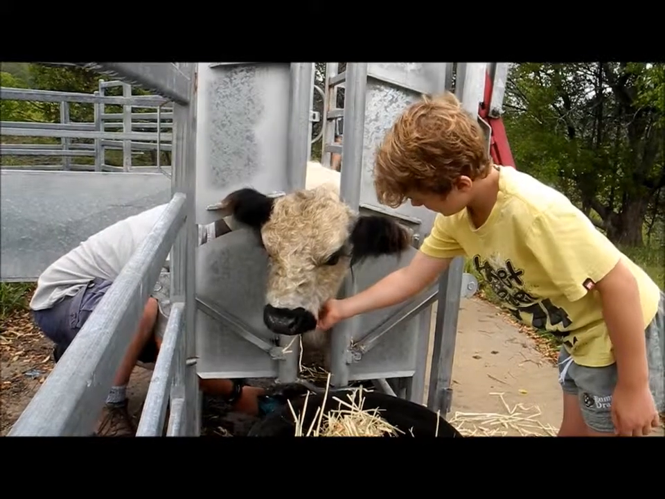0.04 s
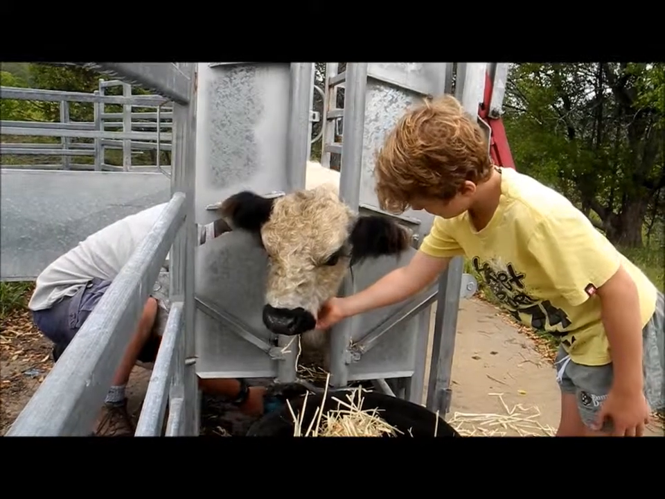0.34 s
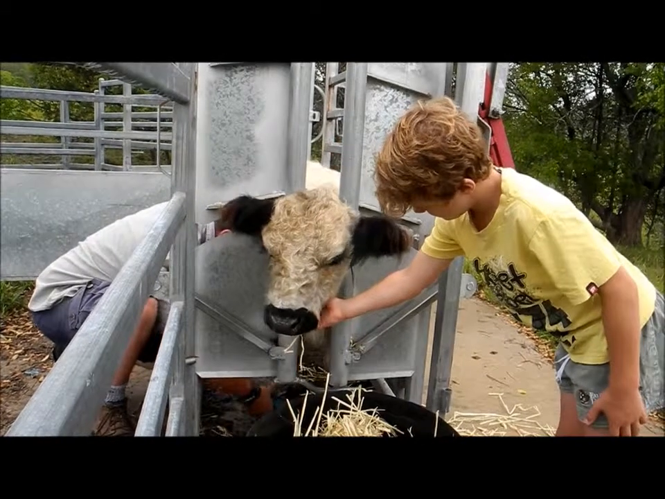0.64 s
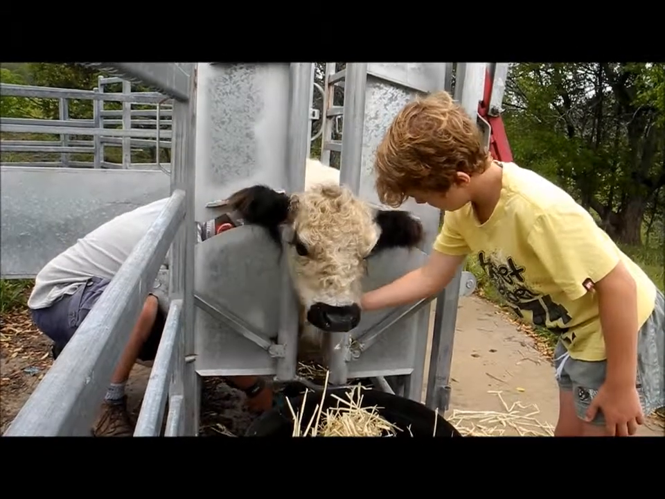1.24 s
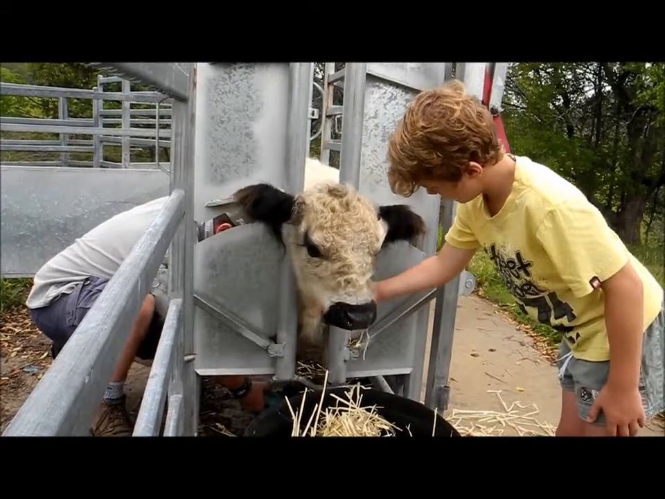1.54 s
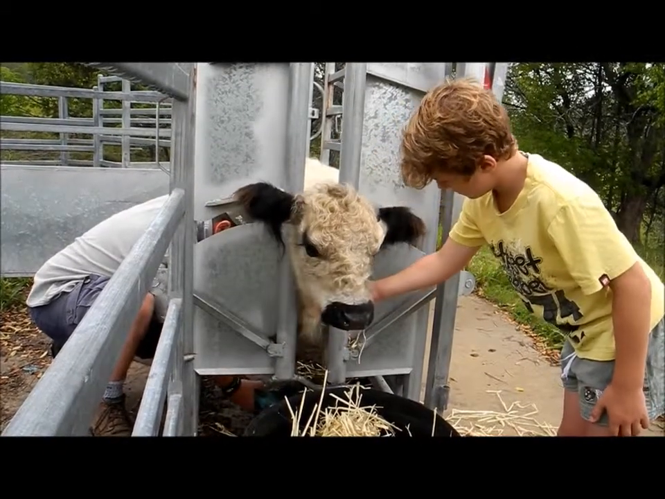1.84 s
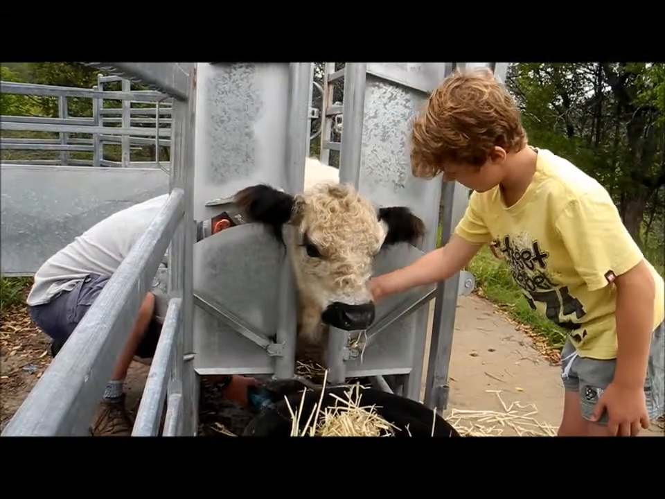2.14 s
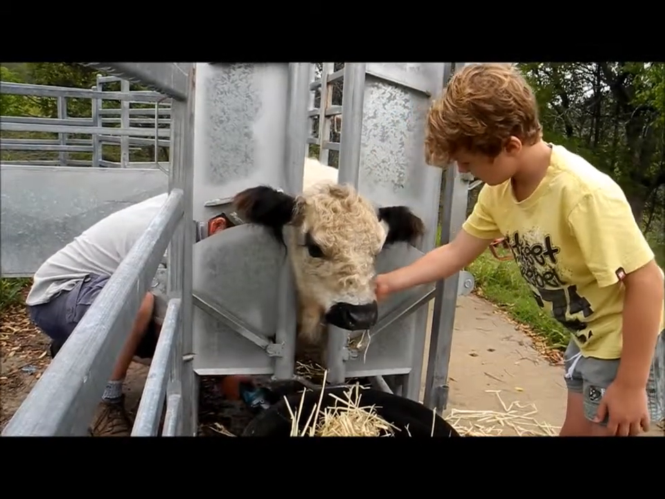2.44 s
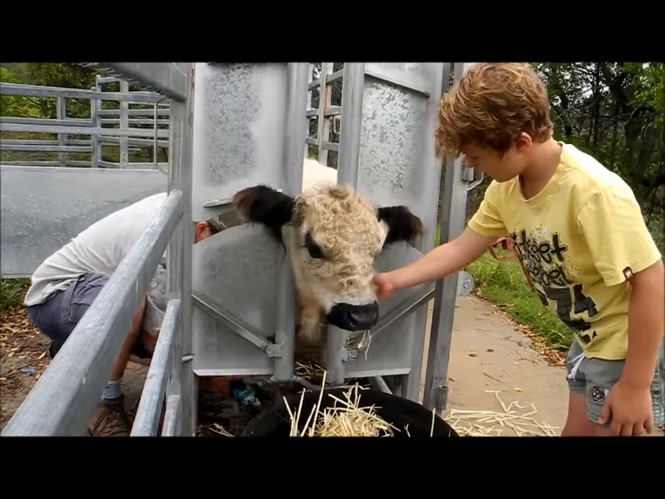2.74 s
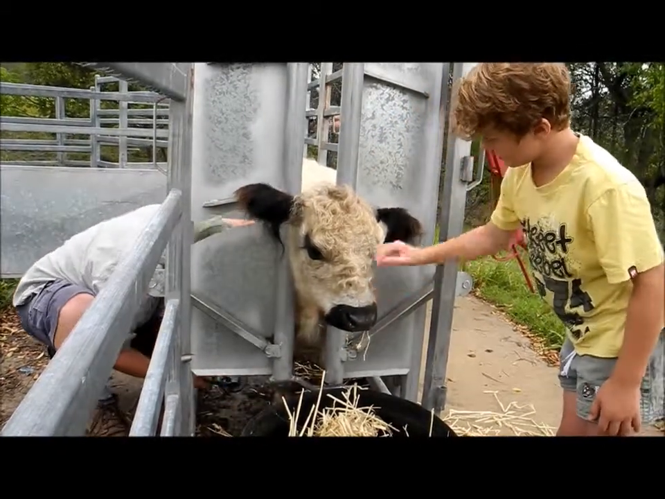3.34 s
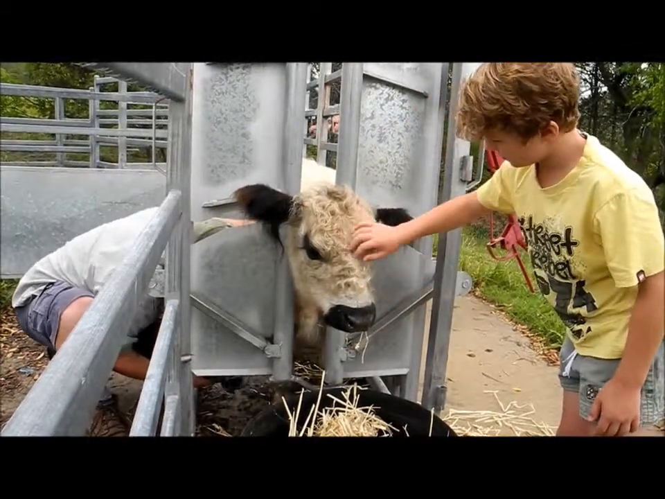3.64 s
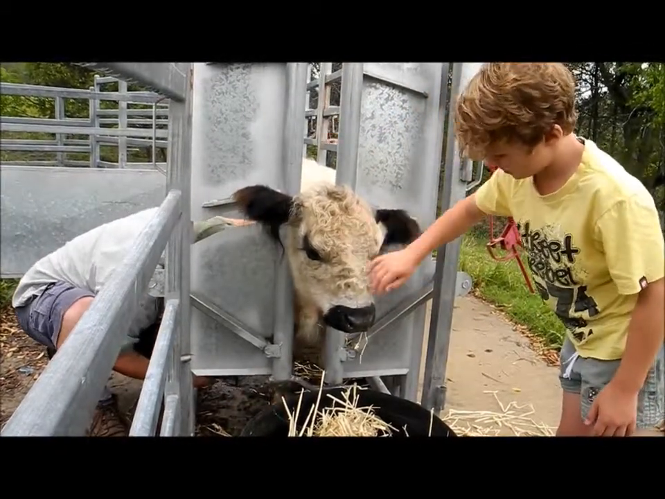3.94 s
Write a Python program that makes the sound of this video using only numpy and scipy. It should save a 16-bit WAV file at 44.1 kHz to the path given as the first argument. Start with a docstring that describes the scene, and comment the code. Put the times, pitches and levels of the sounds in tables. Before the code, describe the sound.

An angle grinder trims a cow's hoof close by outdoors, its coarse rasp and gritty hiss mixed with a wavering whine and brief ringing squeals. At about 2.6 seconds the disc lifts off, and the motor speeds up into a quieter, airy whirr with thin whistles and a short metallic ring. Around 3.6 seconds it switches off and coasts, gears rattling and ringing faintly until 4 seconds.

```python
"""Outdoors at a steel cattle chute, close up on a stereo microphone: an angle grinder trims a cow's hoof.
The disc scrapes once a turn, rings and throws grit, and the load holds the motor back. Lifted off,
it speeds up to a quieter whirr of fan air, two whistles and brief metallic rings;
then it is switched off and coasts down with rattling gears."""
import sys
import numpy as np
from scipy import signal
from scipy.fft import rfft, irfft, next_fast_len
from scipy.io import wavfile
from scipy.ndimage import uniform_filter1d, map_coordinates

SR = 44100
rng = np.random.default_rng(int(sys.argv[2]) if len(sys.argv) > 2 else 0)


def write(x):
    x = np.atleast_2d(x).T
    wavfile.write(sys.argv[1], SR, np.round(np.clip(x, -1, 1) * 32767).astype(np.int16))


N = 176400
STEP = 64  # samples per control point
T = np.arange(N) / SR
SLOW_T = T[::STEP]
LIFT_S, OFF_S = 2.637, 3.565  # the disc leaves the hoof; the motor is switched off
FULL_BITE_DB = -41  # top of the scraping curve

# speed of the shaft (time [s], speed [turns/s])
SHAFT_SPEED = [(0, 133.4), (.11, 128.9), (.15, 133.4), (.21, 131.6), (.31, 134.2), (.4, 130.4),
               (.63, 126.1), (.71, 130), (.87, 130.9), (.98, 135.2), (1.1, 136.3), (1.27, 134.7),
               (1.38, 129.8), (1.5, 127.5), (1.71, 130.5), (1.97, 128.7), (2.33, 133.9), (2.59, 131.9),
               (2.72, 148), (2.86, 154.8), (3.05, 157.2), (3.57, 158.3), (4, 113)]
# how hard the disc scrapes (time [s], level [dB])
SCRAPE_LEVEL = [(0, -42), (.38, -44.5), (.41, -49), (.51, -48), (.545, -43), (.58, -48.5), (.61, -43.5),
                (.72, -49.5), (.88, -47), (1.07, -50), (1.15, -45.5), (1.28, -48), (1.31, -48.5),
                (1.4, -49.5), (1.43, -46.5), (1.52, -45.5), (1.68, -43), (1.78, -47), (1.97, -42),
                (2.12, -44), (2.25, -45.5), (2.35, -41), (2.44, -44.5), (2.63, -42.5)]


def disc_whine(angle):
    """An uneven scrape each turn makes shaft harmonics; those in the disc's resonances squeal."""
    # buzz spectrum (frequency [Hz], gain [dB])
    buzz_spectrum = [(520, -16), (770, -28.5), (905, -16), (1080, -14.5), (1650, -16.5), (3000, -6),
                     (8200, -24)]
    # resonances of the disc on the hoof (centre [Hz], width [Hz])
    resonances = [(1417, 128), (2032, 196), (2559, 117), (2980, 260), (3390, 165), (5120, 148)]
    # strength of each resonance, lowest first (time [s], level [dB])
    ring_1 = [(.68, -51.5), (.86, -42), (1, -55.5), (1.62, -41.5), (2, -58)]
    ring_2 = [(0.11, -34.5), (0.23, -44), (0.34, -35), (0.43, -40), (0.57, -35), (0.62, -43), (1.27, -55),
              (1.29, -34.5), (1.34, -42), (1.8, -34.5), (1.94, -46), (2.01, -38), (2.5, -34)]
    ring_3 = [(0.26, -31), (0.3, -46.5), (0.39, -28.5), (0.48, -32), (.58, -37), (.61, -32), (1.22, -30.5),
              (1.35, -39.5), (1.39, -33), (1.47, -35.5), (1.96, -33), (2.03, -43), (2.16, -31.5),
              (2.29, -39), (2.35, -30.5), (2.43, -42.5), (2.49, -31.5), (2.59, -43)]
    ring_4 = [(0.13, -53), (0.15, -37.5), (0.42, -60), (.585, -52), (.61, -36.5), (0.94, -38.5),
              (0.99, -50), (2.14, -39.5), (2.2, -52), (2.41, -41.5), (2.62, -56)]
    ring_5 = [(.57, -49), (.62, -36.5), (1.14, -33), (1.4, -49), (2.08, -46), (2.6, -49)]
    ring_6 = [(.45, -52), (1.15, -44), (1.3, -55), (1.82, -45), (1.88, -37.5), (1.94, -46), (2.01, -39.5),
              (2.12, -40.5), (2.18, -50)]
    rings = (ring_1, ring_2, ring_3, ring_4, ring_5, ring_6)
    speed = curve(SHAFT_SPEED, SLOW_T)
    force = contact(SLOW_T) * amp(1.1 * wobble(110))
    buzz_db = pressure_db(SLOW_T)
    whine = 0
    for order in range(4, 80):
        hz = order * speed
        gain = amp(buzz_db + along(buzz_spectrum, hz) + 4 * wobble(9))
        for (centre, width), ring in zip(resonances, rings):
            detuning = 2 * (hz - centre) / width
            squeal = amp(curve(ring, SLOW_T)) / np.hypot(1, detuning ** 2)
            gain = np.hypot(gain, squeal)
        flicker = amp(1.1 * wobble(20))
        whine = whine + partial(order * angle, gain * force * flicker, rough=.16, width=.42)
    return whine


def hoof_scrape(angle):
    """Horn tears off in bursts tied to the turning disc: a coarse rasp and a spray of grit."""
    # spectra of rasp and grit (frequency [Hz], gain [dB])
    rasp_spectrum = [(400, -28), (1000, -15.5), (1650, -11), (2100, 4.5), (5000, -4.5), (10000, -53)]
    grit_spectrum = [(3000, -15.5), (5500, -0.5), (9300, -0.5), (15500, -6.5)]
    bite_db = 1.4 * np.cos(angle) + 1.9 * np.cos(2 * angle) + 1.5 * full(wobble(130) + wobble(16))
    rasp = amp(pressure_db(T) + 4.3) * rush(rasp_spectrum, amp(bite_db), patchy_db=2.8)
    grit = amp(curve(SCRAPE_LEVEL, T) + 3) * rush(grit_spectrum, amp(.62 * bite_db), patchy_db=3.2)
    lingering = amp(-4.5 - 14.5 * since(LIFT_S, T))  # a fainter hiss outlasts the lift
    scrape = rasp * contact(T) + grit * np.maximum(contact(T), lingering)
    return scrape * amp([[.5], [-.5]])  # slightly left


def motor_and_fan(angle):
    """The motor hums and drones; its fan air whistles near full speed and ebbs as the fan coasts."""
    # motor hum and fan whistles (shaft harmonic [number], level [dB])
    hum_tones = [(1, -66.5), (2, -61.5)]
    whistle_tones = [(14, -43), (16, -44)]
    # drone on the third shaft harmonic (time [s], level [dB])
    drone_level = [(.3, -55), (1.1, -66), (1.85, -54), (2.4, -49.5), (2.85, -62), (3.65, -61), (3.8, -47.5),
                   (3.9, -63)]
    # fan air spectrum (frequency [Hz], gain [dB])
    air_spectrum = [(25, -28), (130, -15.5), (300, -17.5), (620, -5), (850, -13), (1550, -4.5), (1950, -7),
                    (2500, -0.5), (4300, -8.5), (5400, -17), (9000, -18), (15500, -38)]
    full_speed_hz = 157.2
    speed = curve(SHAFT_SPEED, SLOW_T)
    running_free = (SLOW_T > LIFT_S) * (SLOW_T < OFF_S)
    whistling = np.interp(speed, [155.5, full_speed_hz], [.2, 1]) * running_free
    motor_tones = [*hum_tones, (3, curve(drone_level, SLOW_T))]
    hum = sum(partial(round(order) * angle, amp(db), rough=.3, width=.18) for order, db in motor_tones)
    whistles = sum(partial(round(order) * angle, amp(db) * whistling, rough=.09, width=.35)
                   for order, db in whistle_tones)
    air_db = -38 + (curve(SCRAPE_LEVEL, T) - FULL_BITE_DB) * contact(T)
    flow = full(np.where(SLOW_T > OFF_S, speed / full_speed_hz, 1))
    air = amp(air_db) * flow * rush(air_spectrum, amp(np.cos(angle)), patchy_db=2.2)
    return hum + whistles + air


def gear_rattle(angle, fade_db_per_s=12.5):
    """With the power off, the slack gears chatter unevenly and fade."""
    # rattle spectrum (frequency [Hz], gain [dB])
    rattle_spectrum = [(150, -11), (3900, 0.5), (5800, -11), (9500, -8.5), (10000, -1.5), (10800, -15)]
    chatter = amp(3.2 * full(wobble(260)) + 2 * np.cos(angle))
    fade = (T > OFF_S) * amp(-37 - fade_db_per_s * since(OFF_S, T))
    return fade * rush(rattle_spectrum, chatter, patchy_db=3)


def gear_case():
    """The unloaded gears set the case ringing in short, wavering swells."""
    # rings of the case (middle [s], half length [s], frequency [Hz], level [dB])
    case_rings = [(2.69, .07, 2055, -47), (2.716, 0.15, 3950, -50), (3.68, 0.17, 4060, -53),
                  (3.72, 0.011, 5150, -43), (3.91, 0.054, 4670, -48)]
    ringing = 0
    for middle, half, hz, db in case_rings:
        swell = amp(db) * np.exp(-np.square((SLOW_T - middle) / half))
        ringing = ringing + partial(2 * np.pi * hz * T, swell, rough=.6, width=.4)
    return ringing


def contact(t, release_db_per_s=750):
    """1 while the disc is on the hoof, dying quickly once it lifts."""
    return amp(-release_db_per_s * since(LIFT_S, t))


def pressure_db(t):
    """Base level of buzz and rasp: they follow the grit, with a smaller swing."""
    return FULL_BITE_DB + .55 * (curve(SCRAPE_LEVEL, t) - FULL_BITE_DB)


def partial(angle, gain, rough, width):
    """One fluttering tone; reflections off the steel make it differ from left to right."""
    mid = np.exp(2j * wobble(0.94)) + rough * (wobble(70) + 1j * wobble(70))
    side = width * np.exp(2j * wobble(2.115))
    cos, sin = np.cos(angle), np.sin(angle)
    channels = (gain * (mid + side), gain * (mid - side))
    return np.array([full(channel.real) * cos - full(channel.imag) * sin for channel in channels])


def rush(spectrum, gate, patchy_db):
    """Stereo noise of rms 1, chopped by a gate, with patches of random gain."""
    # likeness of left and right at the microphone (frequency [Hz], correlation [0-1])
    likeness = [(30, 0.28), (400, 0.99), (2500, 0.66), (4500, 0.61), (8000, 0)]

    def mid_side_response(hz):
        spread = np.arccos(np.clip(along(likeness, hz), -1, 1)) / 2
        return amp(along(spectrum, hz)) * [np.cos(spread), np.sin(spread)]

    *_, bins = signal.stft(rng.standard_normal((2, N)), nperseg=1024)
    patches = uniform_filter1d(rng.standard_normal(bins.shape[1:]), size=4, axis=0)  # across frequency
    patches = uniform_filter1d(patches, size=14)  # across time
    _, noise = signal.istft(bins * amp(patchy_db * unit(patches)), nperseg=1024)
    mid, side = filtered(noise[:, :N] * gate, mid_side_response)
    return unit(np.array([mid + side, mid - side]))


def filtered(x, response):
    """x shaped by a frequency response."""
    size = next_fast_len(N + SR // 4)
    return irfft(rfft(x, size) * response(np.fft.rfftfreq(size, 1 / SR)), size)[..., :N]


def wobble(rate):
    """A smooth random control curve, rate knots a second."""
    return map_coordinates(rng.standard_normal(len(SLOW_T)), [SLOW_T * rate + 2], mode="wrap")


def full(control):
    """A control curve at one value per sample."""
    knots = np.asarray(control, np.float32)[:, None]
    ramp = np.arange(STEP, dtype=np.float32) / STEP
    return (knots + np.diff(knots, axis=0, append=knots[-1:]) * ramp).ravel()[:N]


def curve(points, t):
    """(time, value) points read at times t."""
    return np.interp(t, *np.transpose(points))


def along(points, hz):
    """(frequency, value) points read on a log axis."""
    freqs, values = np.transpose(points)
    return np.interp(np.log1p(hz), np.log1p(freqs), values)


def since(start, t):
    """Seconds gone by after start, zero before it."""
    return np.maximum(t - start, 0)


def amp(db):
    """Decibels to amplitude."""
    return 10 ** (np.asarray(db) / 20)


def unit(x):
    """x scaled to rms 1."""
    return x / np.sqrt(np.mean(x ** 2) + 1e-20)


def scene():
    """The grinder at the chute: one shaft paces every layer but the ringing case."""
    speed = curve(SHAFT_SPEED, T) + .25 * full(wobble(25))
    angle = (2 * np.pi * (np.cumsum(speed) / SR % 1)).astype(np.float32)
    whine = disc_whine(angle) * amp([[-.7], [.7]])  # slightly right
    return whine + hoof_scrape(angle) + motor_and_fan(angle) + gear_case() + gear_rattle(angle)


def record(dry):
    """The camera microphone keeps nothing above its band limit."""
    top_hz = 15750
    return filtered(dry, lambda hz: np.clip((top_hz - hz) / 100, 0, 1))


dry = scene()
out = record(dry)
write(out)
```